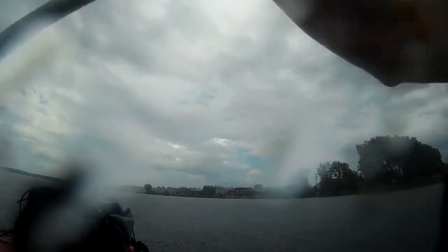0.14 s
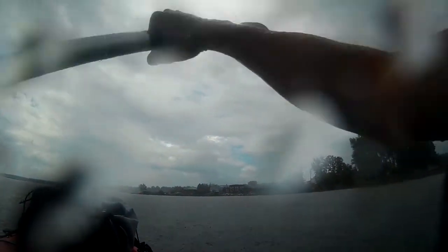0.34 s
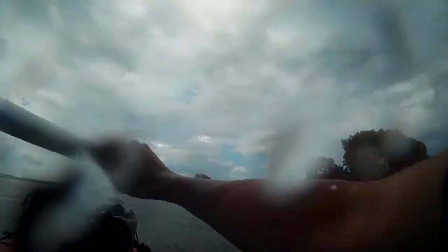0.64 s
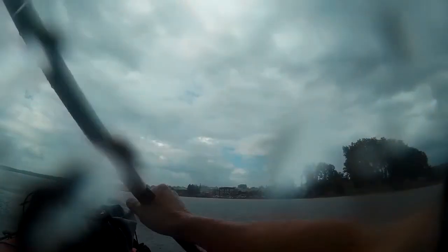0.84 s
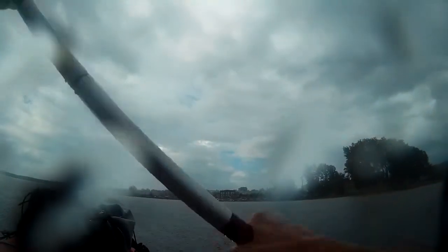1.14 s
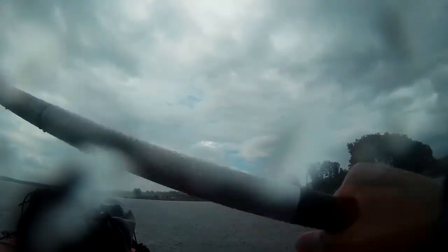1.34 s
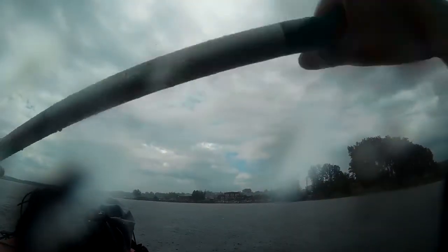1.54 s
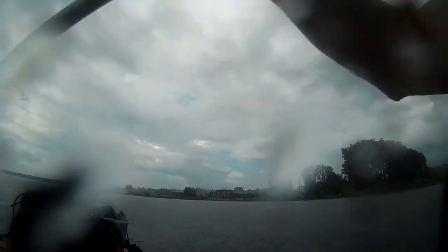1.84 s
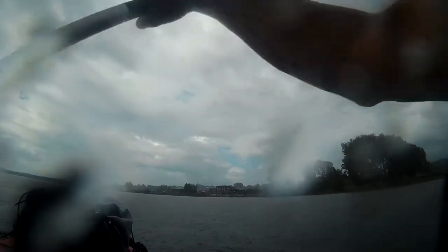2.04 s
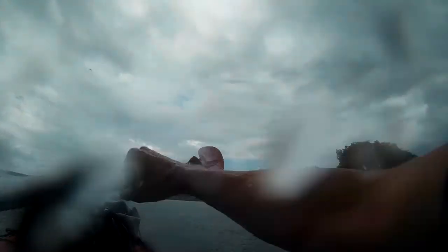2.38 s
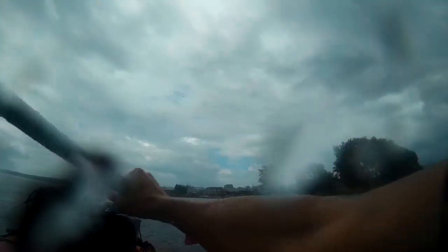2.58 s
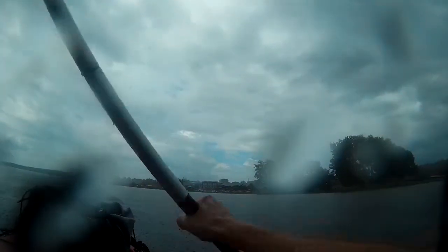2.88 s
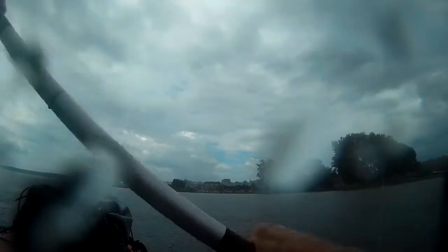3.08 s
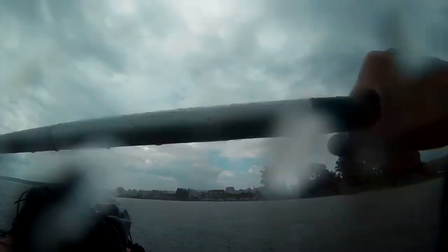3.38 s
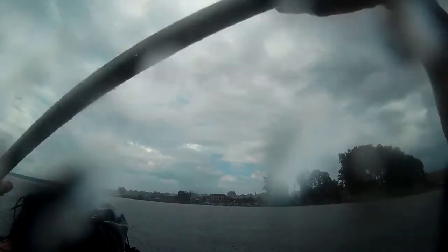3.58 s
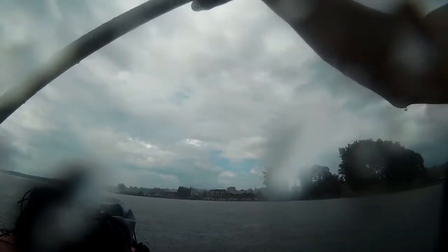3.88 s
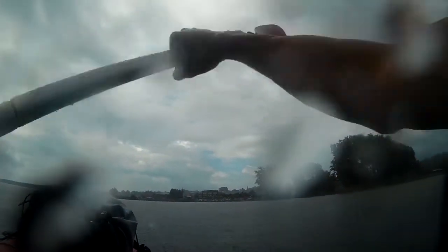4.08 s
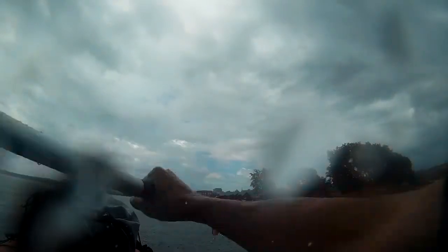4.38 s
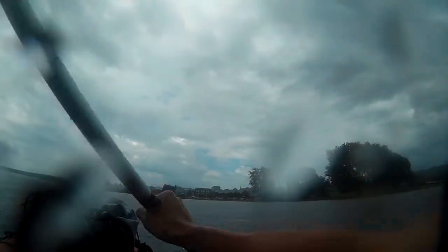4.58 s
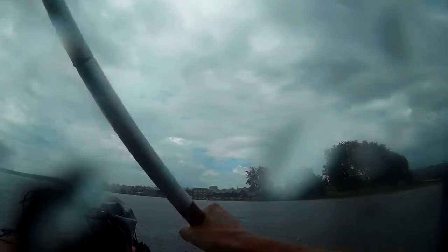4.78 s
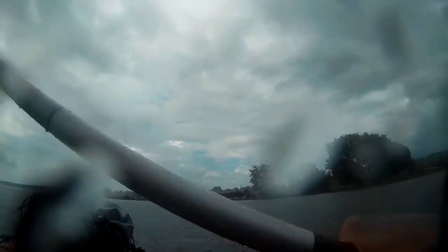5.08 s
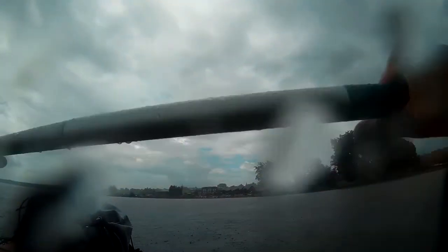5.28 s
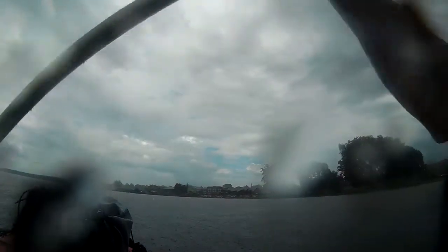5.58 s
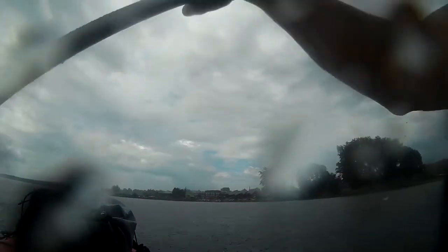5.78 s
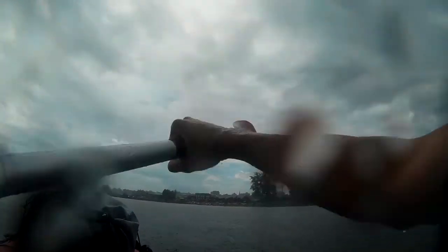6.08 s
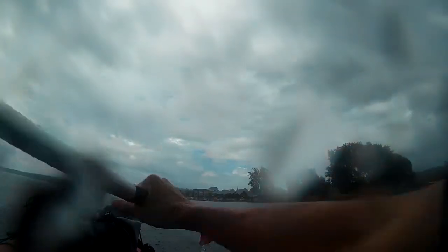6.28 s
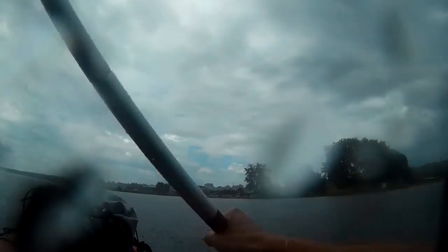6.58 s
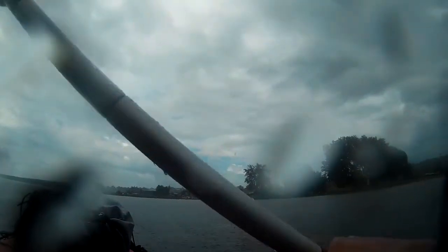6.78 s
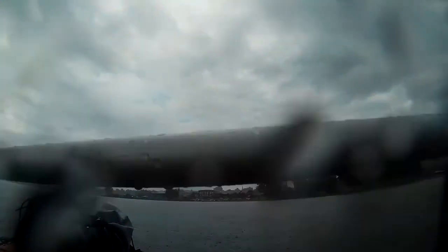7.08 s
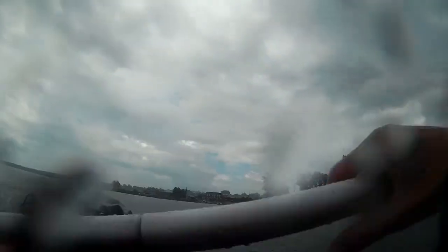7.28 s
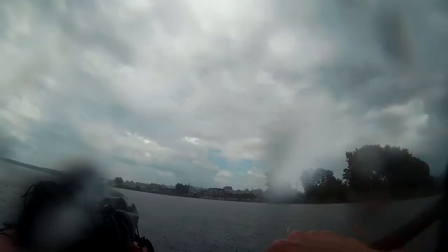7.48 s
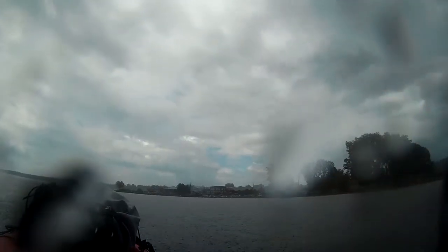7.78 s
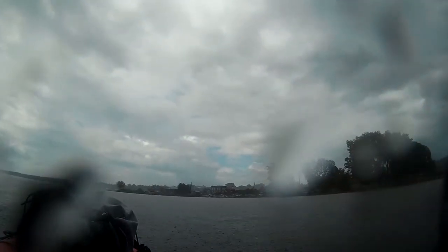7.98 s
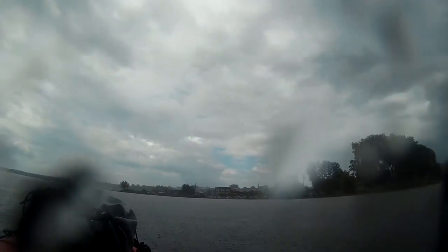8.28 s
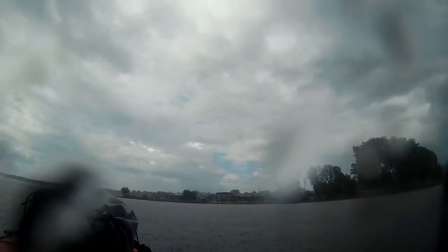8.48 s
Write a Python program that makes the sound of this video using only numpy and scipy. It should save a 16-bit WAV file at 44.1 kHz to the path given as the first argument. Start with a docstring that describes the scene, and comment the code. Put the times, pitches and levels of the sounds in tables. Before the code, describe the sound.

Raindrops and paddle drips tap sharply on a plastic camera case, over faint hiss, muffled water and soft knocks on a boat's hull.

```python
"""Rain and paddle drips tap on the sealed plastic case of a camera on a boat.
Each impact excites the damped normal modes of the case, and fine drizzle patters on it the same way.
Behind the taps, the hull rumbles and thumps with the paddle strokes, water splashes and trapped
bubbles ring. The preamplifier adds a steady hiss."""
import sys
import numpy as np
from scipy import signal
from scipy.io import wavfile
from scipy.ndimage import uniform_filter1d

SR = 44100
rng = np.random.default_rng(int(sys.argv[2]) if len(sys.argv) > 2 else 0)


def log_audio(samples):
    """Write samples as a 16-bit WAV file to the path given in sys.argv[1]."""
    # one column per channel
    frames = np.atleast_2d(samples).T
    # limit to full scale, then quantise
    limited = np.clip(frames, -1, 1)
    pcm = np.round(limited * 32767).astype(np.int16)
    wavfile.write(sys.argv[1], SR, pcm)


N = 381024

# Normal modes of the case, one list for each part: back door, air cavity, side walls, front plate,
# lens port, small fittings. Each mode is (frequency [Hz], level [dB], decay time T60 [s]).
CASE_MODES = [
    [(650, 3.5, 0.0057), (1090, 3.5, 0.011)],
    [(1294, -4.5, 0.0092), (1290, -6, 0.025)],
    [(1507, -16, 0.004), (1813, 0.5, 0.0095), (1864, -18.5, 0.041), (2190, -7.5, .012)],
    [(2954, -17, 0.038), (3250, -1, .011), (3465, -5.5, 0.0062)],
    [(4145, -9, 0.016), (4360, -1, 0.012)],
    [(5133, -1.5, 0.0091), (5830, -3, 0.0063), (7070, -9.5, 0.0068), (8750, -12, .006), (10980, -9, 0.0056)],
]
MODE_COUNT = sum(map(len, CASE_MODES))


def gain_of(db):
    """Amplitude ratio of a level: a factor of ten for every 20 dB."""
    return 10 ** (np.asarray(db) / 20)


def unit_rms(x):
    """Normalisation to a mean power of one."""
    return x / np.sqrt(np.mean(x ** 2) + 1e-20)


def add(mix, onset_s, sound):
    """Linear superposition of a sound on the mix, from its onset."""
    part = mix[round(onset_s * SR):][:len(sound)]
    part += sound[:len(part)]


def water_envelope(layer):
    """Amplitude envelope of the "splash" or "rumble" layer, interpolated in decibels."""
    # Slow swells of the water noise: (time [s], splash level [dB], rumble level [dB])
    water_levels = [(0.0, -73, -64.5), (0.48, -68, -62.5), (1.25, -72, -67), (1.54, -66.5, -62.5),
                    (1.73, -63.5, -65.5), (1.9, -71, -64.5), (2.38, -71.5, -63), (2.65, -66, -62),
                    (2.84, -68, -64.5), (3.08, -71, -64.5), (3.25, -65, -64), (3.7, -65.5, -64),
                    (3.9, -73, -66), (4.23, -73, -66), (4.64, -67, -64), (5.0, -71.5, -65.5),
                    (5.29, -65, -64), (5.92, -77, -65), (6.3, -67, -62), (6.74, -77, -66),
                    (6.95, -68, -66.5), (7.22, -64.5, -60.5), (7.55, -65.5, -64.5), (7.68, -72.5, -64.5),
                    (7.85, -77, -68), (8.64, -76, -65.5)]
    times, splash_db, rumble_db = np.transpose(water_levels)
    levels_db = {"splash": splash_db, "rumble": rumble_db}[layer]
    return gain_of(np.interp(np.arange(N) / SR, times, levels_db))


def shaped_noise(spectrum, patchy_db):
    """Spectral shaping of Gaussian noise, with louder and softer patches in time and frequency."""
    frames, hz = N // 256 + 5, np.fft.rfftfreq(1024, 1 / SR)
    real, imag, patches = rng.standard_normal((frames, 513, 3)).T
    patches = uniform_filter1d(patches, size=8, axis=0)  # smooth across frequency
    patches = unit_rms(uniform_filter1d(patches, size=6, axis=1))  # and across time
    knots_hz, knots_db = np.transpose(spectrum)
    colour_db = np.interp(np.log(hz + 1), np.log(knots_hz), knots_db)
    spectra = (real + 1j * imag) * gain_of(colour_db[:, None] + patchy_db * patches)
    return unit_rms(signal.istft(spectra, nperseg=1024, noverlap=768)[1][:N])


def hull(attack_s=0.004, wash_t60=0.41):
    """Structure-borne sound: a low rumble, and damped knocks of sagging pitch with a wash of water."""
    # Spectrum of the hull rumble: (frequency [Hz], relative density [dB])
    rumble_spectrum = [(15, -14.5), (40, -3.5), (135, 0), (220, -4.5), (350, -6), (500, -10.5), (900, -18),
                       (2000, -40)]
    # Water and paddle knocking on the hull: (time [s], level [dB], frequency [Hz], decay time T60 [s])
    thumps = [(1.377, -54, 117, 0.091), (2.678, -47, 150, 0.12), (2.834, -45, 124, 0.16),
              (3.028, -42.5, 148, 0.08), (3.313, -46, 160, 0.11), (3.831, -46, 140, 0.073),
              (4.518, -39.5, 112, 0.08), (5.377, -52, 134, 0.071), (6.024, -50, 116, 0.092),
              (6.267, -49, 123, 0.15), (7.22, -42.5, 115, 0.08), (8.201, -48, 108, 0.09),
              (8.37, -49, 126, 0.11)]
    out = water_envelope("rumble") * shaped_noise(rumble_spectrum, patchy_db=1.2)
    water = shaped_noise(rumble_spectrum, patchy_db=3.5)
    t = np.arange(8000) / SR
    attack = 1 - np.exp(-(t / attack_s) ** 2)
    for onset_s, db, hz, t60 in thumps:
        knock = np.sin(2 * np.pi * hz * (t - 0.8 * t ** 2)) * gain_of(-60 * t / t60)
        wash = gain_of(-12 - 60 * t / wash_t60) * water[round(onset_s * SR):][:len(t)]
        add(out, onset_s + .008, gain_of(db) * attack * (knock + wash))
    return out


def splash():
    """Transmission through a wall: the sealed case muffles rain on the lake and the blade's swish."""
    # Water noise as the case colours it: (frequency [Hz], relative density [dB])
    splash_spectrum = [(500, -10.5), (900, -5.5), (1100, -6.5), (1290, 1), (1480, -17.5), (1860, -11),
                       (2500, -19.5), (4250, -17.5), (6000, -28)]
    return water_envelope("splash") * shaped_noise(splash_spectrum, patchy_db=3.5)


def bubbles(t60=0.058, rise=4., attack_cycles=0.31):
    """Bubble resonance: trapped air rings as a damped oscillator whose pitch climbs a little."""
    # Plops and pings of single bubbles: (time [s], level [dB], starting frequency [Hz])
    plops = [(.594, -57, 650), (.657, -59.5, 3000), (.797, -50.5, 600), (1.076, -45.5, 2900),
             (1.917, -52, 370), (3.042, -43.5, 308), (4.543, -55, 500), (4.871, -49, 406),
             (7.273, -45, 726)]
    out, t = np.zeros(N), np.arange(2000) / SR
    for onset_s, db, hz in plops:
        attack = 1 - np.exp(-(t * hz / attack_cycles) ** 2)
        chirp = np.sin(2 * np.pi * hz * (t + rise * t ** 2))
        add(out, onset_s, gain_of(db - 60 * t / t60) * attack * chirp)
    return out


def case_tap(parts_db, spot_db=2.5, detune=0.015, attack_cycles=0.85, align_s=.0008):
    """Modal response to one drop: the spot struck shifts each mode's phase, level and pitch."""
    out, t = np.zeros(1600), np.arange(1600) / SR
    modes = [(part_db, *mode) for part_db, part in zip(parts_db, CASE_MODES) for mode in part]
    shifts = rng.standard_normal((MODE_COUNT, 3))
    for (part_db, hz, db, t60), (phase, height, bend) in zip(modes, shifts):
        attack = 1 - np.exp(-(t * hz / attack_cycles) ** 2)
        decay = gain_of(part_db + db + spot_db * height - 60 * t / t60)
        # The modes are nearly in phase at align_s, which gives one tall first swing.
        wave = np.cos(2 * np.pi * hz * (1 + detune * bend) * (t - align_s) + .6 * phase)
        out += decay * attack * wave
    polarity = np.sign(shifts[0, 0])
    return out * polarity


def drizzle(drops_per_s=90, spread_db=3.5, spots=16, level_db=-75.5):
    """Shot noise: tiny random impacts, each convolved with the impulse response of the spot it hits."""
    # Mean excitation by small drops, for each part of the case: (relative level [dB])
    excitation_db = (-7, -1, -6, -12, -13, -30)
    sizes = gain_of(spread_db * np.minimum(rng.exponential(1, N), 2.5))
    impacts = sizes * (rng.random(N) < drops_per_s / SR)
    spot_hit = rng.integers(0, spots, N)
    out = np.zeros(N)
    for spot in range(spots):
        parts_db = excitation_db + 4.1 * rng.standard_normal(len(CASE_MODES))
        response = unit_rms(case_tap(parts_db))
        out += signal.oaconvolve(impacts * (spot_hit == spot), response)[:N]
    return gain_of(level_db) * unit_rms(out)


def large_drops():
    """Impact excitation: where a heavy raindrop or paddle drip lands sets how hard each part rings."""
    # Impacts and the excitation of each part: (time [s], back door [dB], air cavity [dB],
    # side walls [dB], front plate [dB], lens port [dB], small fittings [dB])
    drops = [(0.2107, -41, -40.5, -50.5, -71, -62, -57), (0.3712, -45, -48, -46, -54, -66, -59),
             (0.4071, -49.5, -49.5, -60, -73, -65, -68), (0.5083, -53, -51, -55, -66, -61, -65),
             (0.538, -36.5, -32.5, -30.5, -35, -30.5, -33), (0.7144, -44.5, -66, -58, -72, -61, -66),
             (0.7721, -58, -43, -56, -73, -72, -66), (0.7974, -52, -65, -52, -70, -72, -68),
             (0.8061, -68, -69, -77, -53, -44, -55), (0.9126, -44, -26, -32.5, -49, -49, -59),
             (0.9752, -48, -54, -55, -60, -66, -68), (1.0207, -52, -59, -76, -72, -74, -69),
             (1.0745, -59, -31.5, -42, -49, -58, -55), (1.1689, -49, -64, -55, -71, -75, -70),
             (1.3556, -56, -49, -42.5, -58, -65, -66), (1.387, -41.5, -35.5, -34, -42.5, -38.5, -49),
             (1.4786, -59, -41, -49, -60, -62, -65), (1.5646, -44, -25.5, -36.5, -31, -32.5, -35),
             (1.6295, -36, -17.5, -22, -40, -33, -39), (1.7943, -62, -52, -61, -59, -52, -65),
             (1.8438, -35, -37, -30.5, -34, -35.5, -40.5), (1.8595, -47, -43, -59, -61, -57, -66),
             (1.9047, -49, -48, -53, -56, -59, -65), (1.9171, -36, -39, -52, -60, -54, -57),
             (2.0696, -55, -40.5, -47.5, -60, -53, -59), (2.1198, -48, -26, -36.5, -37, -46, -43.5),
             (2.1413, -52, -46, -51, -64, -60, -65), (2.2995, -44, -29.5, -41, -35.5, -32, -36.5),
             (2.4233, -42, -69, -57, -65, -61, -67), (2.4298, -45, -54, -41, -48, -42.5, -46.5),
             (2.4769, -39, -51, -53, -57, -58, -66), (2.5273, -34.5, -50, -30.5, -36.5, -40, -47),
             (2.6483, -35, -37.5, -52, -55, -52, -62), (2.6606, -63, -59, -59, -49, -45, -53),
             (2.6935, -46, -26, -29, -44, -52, -41), (2.7544, -38, -36, -40, -52, -52, -60),
             (2.8319, -46, -59, -42, -52, -57, -67), (2.8407, -63, -62, -59, -51, -53, -59),
             (2.8582, -42, -43, -42, -54, -60, -68), (2.8665, -45, -40, -51, -60, -66, -63),
             (3.0401, -41.5, -38.5, -41.5, -46, -42.5, -45), (3.0934, -44, -40, -43.5, -55, -61, -59),
             (3.1438, -48, -56, -53, -47, -54, -54), (3.1666, -33, -41, -65, -45, -54, -63),
             (3.1731, -43, -46, -42, -51, -42.5, -51), (3.2366, -50, -46, -47.5, -40, -44.5, -58),
             (3.283, -38, -24.5, -23.5, -27.5, -27, -37), (3.328, -40, -44, -45, -60, -60, -62),
             (3.4287, -40.5, -52, -50.5, -58, -55, -67), (3.508, -47, -38, -54, -70, -68, -65),
             (3.5817, -60, -41, -44, -54, -54, -62), (3.6122, -33, -33, -44, -37.5, -38.5, -38),
             (3.6643, -51, -43.5, -47, -51.5, -60, -57), (3.7478, -43, -42, -48, -53, -46, -52),
             (3.8447, -28, -42, -35.5, -48, -46, -55), (4.0159, -55, -55, -60, -68, -75, -73),
             (4.1685, -56, -62, -50.5, -73, -62, -66), (4.1994, -59, -60, -52, -54, -55, -66),
             (4.2173, -57, -51, -48, -54, -67, -68), (4.4093, -46, -47, -36.5, -34, -43, -36),
             (4.5496, -54, -58, -53, -60, -47.5, -57), (4.5924, -46, -52, -51, -72, -71, -68),
             (4.7045, -55, -58, -53.5, -47, -51, -55), (4.7693, -48, -57, -46, -70, -62, -66),
             (4.8717, -50, -57, -58, -76, -73, -73), (4.9622, -58, -53, -51, -58, -60, -62),
             (5.0029, -53, -51, -50, -59, -57, -66), (5.2517, -52, -56, -47.5, -52, -58, -62),
             (5.4481, -53, -43, -45.5, -62, -60, -66), (5.4731, -48, -59, -44, -58, -59, -66),
             (5.5425, -42, -54, -52, -63, -64, -68), (5.5492, -61, -68, -49, -50, -48, -56),
             (5.593, -52, -46, -47, -58, -55, -66), (5.6673, -61, -44, -45, -55, -65, -66),
             (5.6856, -55, -44, -55, -66, -71, -66), (5.7212, -53, -46, -55, -71, -69, -66),
             (5.7567, -63, -50, -63, -64, -59, -69), (5.852, -39.5, -40, -40.5, -54, -56, -59),
             (5.908, -42, -37, -37, -44.5, -52, -53), (5.9644, -52, -51, -67, -73, -72, -70),
             (6.0383, -51, -51, -72, -75, -72, -72), (6.1578, -49, -66, -57, -73, -69, -68),
             (6.2199, -65, -63, -51, -56, -62, -70), (6.2453, -52, -46.5, -62, -70, -66, -68),
             (6.3138, -45, -44, -48, -64, -63, -68), (6.3228, -59, -54, -59, -50, -53, -62),
             (6.3646, -38, -59, -38.5, -59, -55, -65), (6.3812, -53, -53, -54, -72, -67, -67),
             (6.4693, -34.5, -48, -56, -60, -57, -67), (6.5603, -48, -48.5, -65, -73, -72, -70),
             (6.6139, -36.5, -39.5, -32, -38.5, -38, -45), (6.769, -70, -65, -51, -61, -60, -63),
             (6.7835, -68, -59, -58, -45, -54, -61), (6.7969, -55, -54, -60, -66, -73, -68),
             (6.985, -35.5, -41, -33.5, -42.5, -52, -42), (7.0312, -52, -41, -66, -66, -66, -67),
             (7.0646, -48, -50, -44, -53, -53, -60), (7.0816, -50, -44, -45, -44, -44, -53),
             (7.102, -50, -44, -48, -57, -58, -63), (7.1267, -47, -25, -30, -27.5, -31.5, -34.5),
             (7.1602, -61, -62, -49, -49, -44.5, -49), (7.256, -44, -40, -34.5, -38.5, -40, -39),
             (7.3524, -42, -32.5, -54, -60, -56, -65), (7.3959, -35, -7.5, -18, -25, -26.5, -33),
             (7.5128, -52, -44, -53, -56, -59, -66), (7.5751, -45.5, -27.5, -41, -40.5, -41.5, -50),
             (7.6071, -35.5, -45, -44, -46, -44.5, -58), (7.6488, -48, -49, -49, -59, -64, -66),
             (7.7302, -48, -43, -51, -41, -47, -45), (7.7388, -41, -41, -29, -43, -46, -48),
             (7.8913, -60, -50, -55, -62, -72, -65), (8.0428, -48.5, -46.5, -41.5, -37.5, -38, -41.5),
             (8.075, -60, -48, -56, -61, -68, -64), (8.0834, -53, -62, -58, -77, -70, -64),
             (8.0891, -55, -56, -69, -57, -53, -55), (8.2469, -34, -23, -42, -41, -56.5, -45),
             (8.2788, -50, -46, -62, -71, -62, -60), (8.3731, -61, -42.5, -53, -60, -63.5, -66),
             (8.418, -58, -52, -55, -63, -62, -66), (8.4444, -56, -38.5, -42, -52, -52, -60),
             (8.4821, -62, -48, -63, -72, -74, -66), (8.5955, -65, -54, -54, -73, -74, -70)]
    out = np.zeros(N)
    for onset_s, *parts_db in drops:
        add(out, onset_s, case_tap(parts_db))
    return out


def scene():
    """Superposition of all sources at the one microphone inside the case."""
    return (large_drops() + drizzle() + splash() + hull() + bubbles())[None]


def record(dry, hiss_db=-68.5, cutoff_hz=15850):
    """Electronic self-noise: the preamplifier adds hiss, then a low-pass filter limits the band."""
    # Spectrum of the preamplifier hiss: (frequency [Hz], relative density [dB])
    hiss_spectrum = [(100, 1), (800, 4), (2500, 0.5), (4200, 0.5), (6200, 1), (14000, 0.5), (16000, -1)]
    hiss = gain_of(hiss_db) * shaped_noise(hiss_spectrum, patchy_db=1.64)
    lowpass = signal.firwin(511, cutoff_hz, window=("kaiser", 9), fs=SR)
    return signal.oaconvolve(dry + hiss, lowpass[None], "same")


dry = scene()
out = record(dry)
log_audio(out)
```